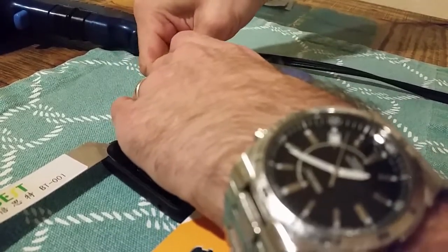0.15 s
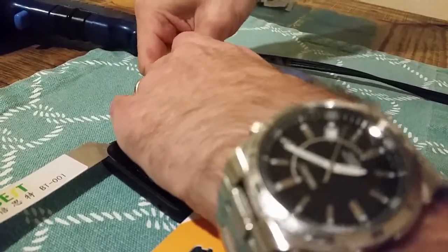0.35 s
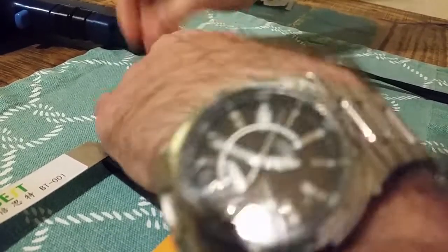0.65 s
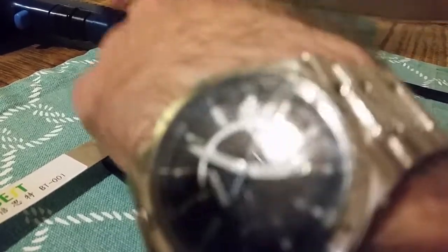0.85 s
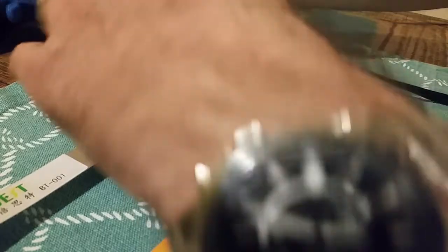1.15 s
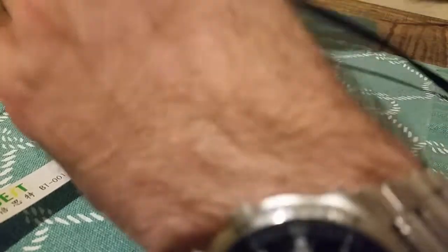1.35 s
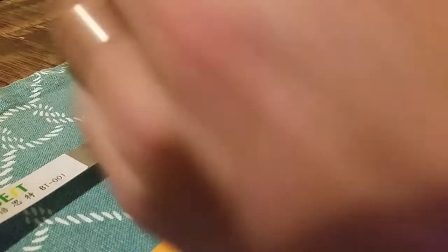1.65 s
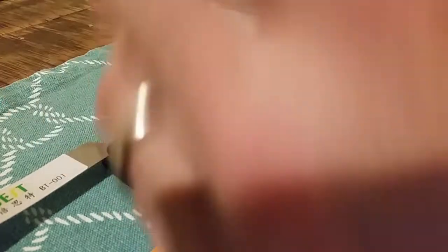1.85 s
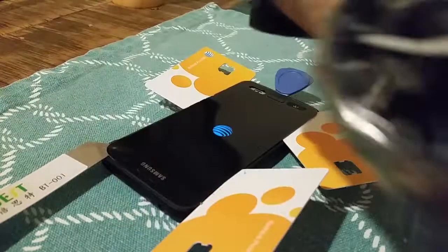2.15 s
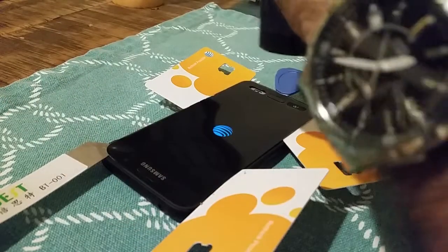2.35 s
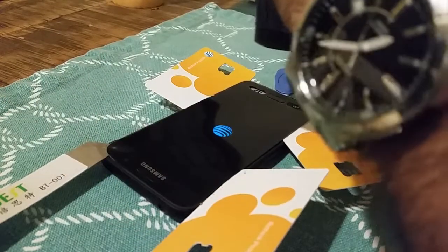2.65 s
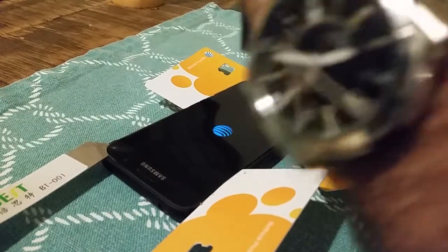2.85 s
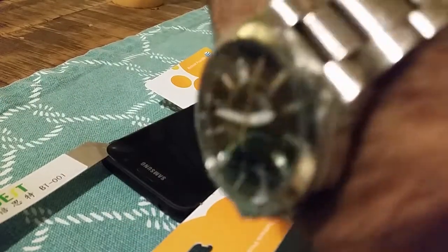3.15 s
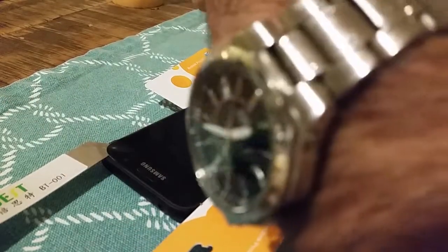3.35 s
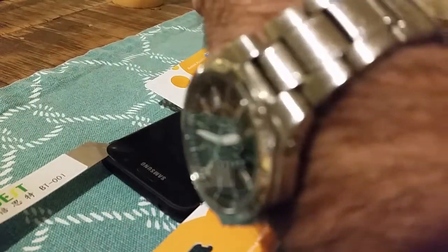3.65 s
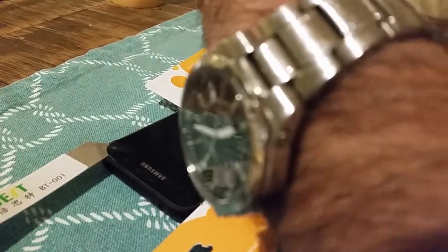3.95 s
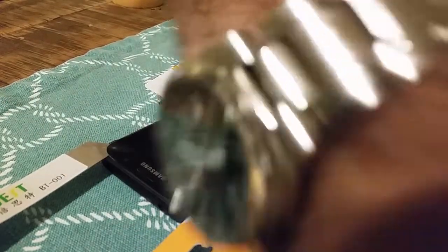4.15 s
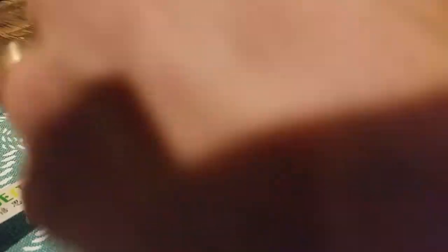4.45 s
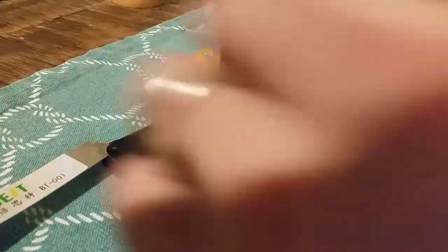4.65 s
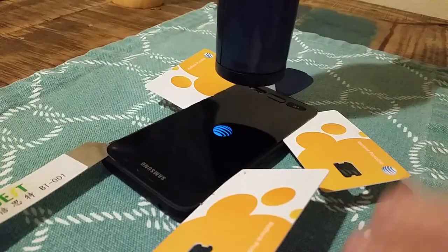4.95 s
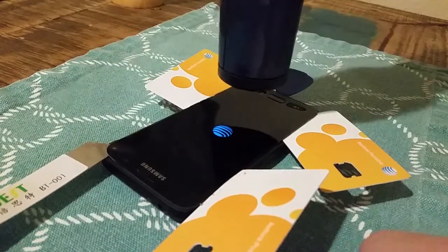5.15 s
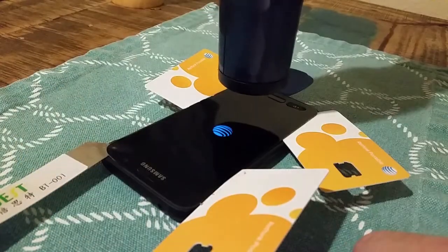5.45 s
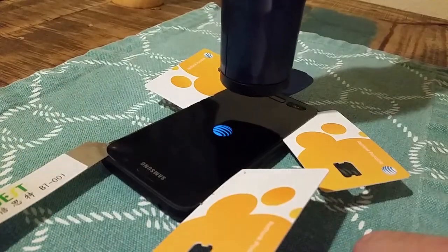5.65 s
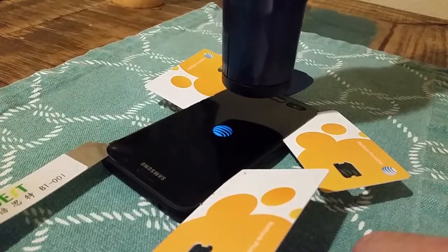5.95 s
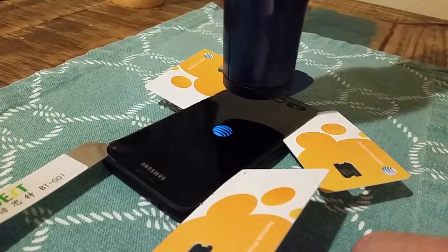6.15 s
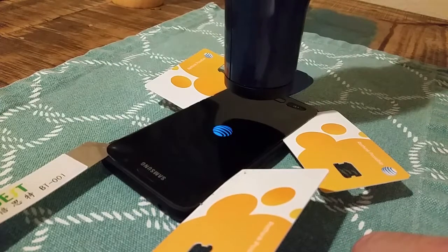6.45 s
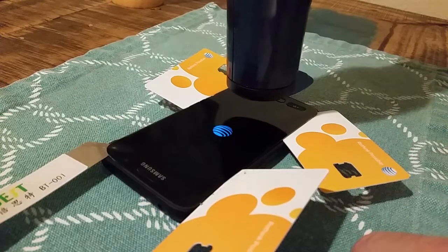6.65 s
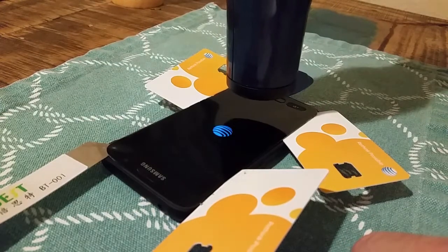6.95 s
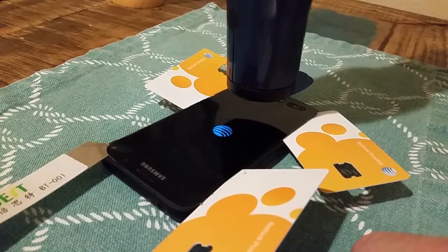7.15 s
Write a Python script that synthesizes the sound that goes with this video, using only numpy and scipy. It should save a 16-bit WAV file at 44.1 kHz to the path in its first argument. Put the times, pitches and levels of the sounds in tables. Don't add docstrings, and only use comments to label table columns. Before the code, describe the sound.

Soft handling rubs and creaks, three knocks on a wooden table, then a switch click and a hair dryer whining and rushing steadily.

```python
import sys
import numpy as np
from scipy import signal
from scipy.io import wavfile
from scipy.ndimage import uniform_filter1d

SR = 44100
rng = np.random.default_rng(int(sys.argv[2]) if len(sys.argv) > 2 else 0)


def to_linear_factor(level_db):
    exponent = np.asarray(level_db, float) / 20
    return 10 ** exponent


def file_out(sig):
    cols = np.atleast_2d(sig).T
    lim = np.clip(cols, -1, 1)
    pcm = np.round(lim * 32767).astype(np.int16)
    wavfile.write(sys.argv[1], SR, pcm)


N = 321489


def evened(x):
    return x / np.sqrt(np.mean(np.abs(x) ** 2) + 1e-20)


def read(points, hz):
    f, value = np.transpose(points)
    return np.interp(np.log(hz + 1), np.log(f + 1), value)


def columns(rows, t):
    s, *rest = np.transpose(rows)
    return [np.interp(t, s, column) for column in rest]


def add(mix, s, sound):
    part = mix[:, round(s * SR):][:, :sound.shape[-1]]
    part += sound[..., :part.shape[1]]


def drift(top_hz):
    t = np.arange(N // 64 + 2) * 64 / SR
    rates_hz = top_hz * np.geomspace(.04, 1, 16) * rng.uniform(.9, 1.1, 16)
    slow = sum(np.sin(2 * np.pi * (f * t + rng.random())) / np.sqrt(f) for f in rates_hz)
    return np.interp(np.arange(N) / SR, t, evened(slow))


def noise(field_db, same, lead=None, patchy_db=1., size=1024):
    frames, hz = N * 4 // size + 5, np.fft.rfftfreq(size, 1 / SR)[:, None]
    a, b, c, d, patches = rng.standard_normal((frames, len(hz), 5)).T
    patches = uniform_filter1d(patches, size=size // 100, axis=0)
    patches = evened(uniform_filter1d(patches, size=12, axis=1))
    level_db, balance_db = field_db(hz, np.arange(frames) * size / 4 / SR)
    share = np.clip(read(same, hz), 0, 1)
    left = a + 1j * b
    right = share * left + np.sqrt(1 - share ** 2) * (c + 1j * d)
    right = right * np.exp(-1j * (read(lead, hz) if lead else 0))
    z = np.array([left * to_linear_factor(balance_db / 2), right * to_linear_factor(-balance_db / 2)])
    z = z * to_linear_factor(level_db + patchy_db * patches)
    return signal.istft(z, nperseg=size, noverlap=size * 3 // 4)[1][:, :N]


def band_db(spectrum_db, hz, lo, hi):
    inside = (hz >= lo) & (hz < hi)
    return 10 * np.log10(np.sum(to_linear_factor(spectrum_db[inside]) ** 2) * 2.035)


def burst(hz, width):
    z = rng.standard_normal((2, 8000)) + 0.68 * rng.standard_normal(8000)
    edges = [max(hz - width / 2, 100), min(hz + width / 2, 16000)]
    band = signal.butter(3, edges, "bandpass", fs=SR, output="sos")
    return evened(signal.sosfilt(band, z)[:, 1500:])


def swell(length):
    return np.sin(np.pi * np.clip(np.arange(6500) / SR / length, 0, 1)) ** 2


def rings(modes, t, slow=0.83):
    return sum(to_linear_factor([[l_db], [r_db]] - 60 * t / (t60 * slow)) * np.sin(2 * np.pi * hz * t)
               for hz, l_db, r_db, t60 in modes)


START_S, SPIN_UP_S, DRAG = 2.5145, .1374, .655
TOP_HZ, SAG_HZ_PER_S, WARM_S = 345.3, 1.3, 4.3


def shaft(t):
    since = np.maximum(t - START_S, 1e-4)
    left = np.exp(-since / SPIN_UP_S)
    return (TOP_HZ - SAG_HZ_PER_S * np.minimum(since, WARM_S)) * (1 - left) / (1 + DRAG * left)


# t/s, level/dB, pan L-R/dB, left lead/rad
AIM = [(2.7, -27, -2, -1.6), (3.05, -25.5, -11, -2), (3.2, -21, 1, -.1), (3.35, -25, 4, -1.2),
       (3.65, -23, -3, -0.85), (3.9, -25.5, 1, -0.57), (4.2, -23.5, 3, -0.73), (4.6, -22, -5.5, 0.66),
       (5.05, -24.5, -11.5, .3), (5.28, -25.5, -3.5, 0.71), (5.8, -22, -4.5, 0.49), (6.45, -23, 0, 0.37),
       (7.29, -23, 1.5, 1.)]


def blade_tone(turn, load, t):
    blade_db, pan_db, lead = columns(AIM, t)
    blade = load ** 0.74 * to_linear_factor(blade_db + 0.82 * drift(top_hz=15.)) * np.sqrt(2)
    left = to_linear_factor(pan_db / 2) * np.cos(5 * turn + lead)
    right = to_linear_factor(-pan_db / 2) * np.cos(5 * turn)
    return blade * np.array([left, right])


# multiple, left level/dB, left near/dB, right level/dB, right near/dB
ORDERS = [(1, -34.5, -34, -28.5, -28.5), (2, -35, -35, -34, -34), (3, -44, -44, -40, -39),
          (6, -47, -47, -47, -42), (10, -39, -38, -33, -38), (15, -42, -43, -42, -52),
          (20, -52, -52, -44, -47), (25, -56, -59, -47, -41.5), (30, -44, -49, -45, -47),
          (35, -39, -43, -42, -47), (37, -39, -42, -52, -57), (38, -40, -34, -55, -52),
          (39, -42, -49, -56, -55), (40, -39, -36.5, -52, -46), (41, -47, -43, -59, -54),
          (45, -43, -50, -52, -52)]
# f/Hz, lead/rad
ORDER_LEAD = [(340, -.3), (1030, -1.3), (2050, -.5), (3430, -1.8), (5140, .2), (6860, .2), (8570, -2.9),
              (10300, 1.3)]
NEARER_S, NEARER_TAKES_S = 3.74, 0.75


def shaft_orders(turn, load, t):
    out = np.zeros((2, N))
    near = np.clip((t - NEARER_S) / NEARER_TAKES_S, 0, 1)
    for k, left_db, left_near_db, right_db, right_near_db in ORDERS:
        wander_db = .8 + .11 * min(k, 18)
        phase = k * turn + .02 * k * drift(top_hz=60.) + 2 * np.pi * rng.random()
        fade = load ** (.25 + min(k, 15) / 7) * np.sqrt(2)
        left_level = left_db + near * (left_near_db - left_db) + wander_db * drift(top_hz=15.0)
        right_level = right_db + near * (right_near_db - right_db) + wander_db * drift(top_hz=19.0)
        out[0] += fade * to_linear_factor(left_level) * np.cos(phase + read(ORDER_LEAD, k * TOP_HZ))
        out[1] += fade * to_linear_factor(right_level) * np.cos(phase)
    return out


# f/Hz, level/dB
BUZZ = [(119.9, -44), (179.9, -49)]


def motor():
    t = np.arange(N) / SR
    speed_hz = shaft(t)
    turn = 2 * np.pi * np.cumsum(speed_hz * (1 + 0.0005 * drift(top_hz=24.6))) / SR
    load = (speed_hz / speed_hz.max()) ** 3
    out = blade_tone(turn, load, t) + shaft_orders(turn, load, t)
    for hz, db in BUZZ:
        level = np.sqrt(2) * to_linear_factor(db + 2.5 * drift(top_hz=20.))
        out += level * np.sin(2 * np.pi * hz * t + .5 * drift(top_hz=10.))
    return out * np.clip((t - 2.58) / .12, 0, 1) ** 2


HAND_S, HAND_TAKES_S, HAND_DB = 4.05, 0.84, 3
HAND_FROM_HZ, HAND_TO_HZ, HAND_OCTAVES = 900, 2290, 0.34


def hand_reflection_db(hz, t):
    passed = np.clip((t - HAND_S) / HAND_TAKES_S, 0, 1)
    off = np.log2((hz + 1) / HAND_FROM_HZ) - passed * np.log2(HAND_TO_HZ / HAND_FROM_HZ)
    return HAND_DB * np.sin(np.pi * passed) ** .5 * np.exp(-(off / HAND_OCTAVES) ** 2)


# f/Hz, level/dB per Hz
RUSH = [(25, -62), (50, -59), (90, -23.5), (290, -13), (450, -15), (700, -8.5), (1300, -9), (1850, -15),
        (3200, -15.5), (4200, -15.5), (4900, -21), (9700, -27), (13300, -20.5), (15700, -25.5)]
# f/Hz, width/Hz, level/dB
BARREL = [(739, 140, 5), (960, 120, 0.5), (2550, 110, 6.5), (4180, 940, -2.5), (12500, 2500, -0.5),
          (1576, 590, -4), (4860, 190, -3)]
# f/Hz, L-R level/dB
RUSH_BALANCE = [(60, -6), (110, 5), (200, -2), (380, 1), (700, -3), (1290, -6), (2380, -7), (4400, 0.5),
                (8120, -4), (15000, 10)]
# f/Hz, likeness/0..1
RUSH_SAME = [(60, .95), (700, .94), (1250, .88), (1550, .5), (1900, .6), (2250, .25), (2800, .7),
             (3600, .5), (4200, .2), (5200, .3), (8000, .25), (16000, .15)]
# f/Hz, lead/rad
RUSH_LEAD = [(60, -.1), (450, -.4), (800, -1.4), (1300, -1.1), (1700, -.4), (2100, -1), (2600, -2.7),
             (4500, -3.1), (6500, -4), (16000, -9)]
# f/Hz, power/1
GROWTH = [(200, 1.36), (1200, 1.8), (4000, 3.9), (8000, 3.3), (10000, 1.87)]
RUSH_DB, RUMBLE_DB = -17, -7.5
AIR_LAG_S = 0.015


def air():
    def field(hz, t):
        colour = read(RUSH, hz) + sum(db / (1 + (2 * (hz - f) / w) ** 2) for f, w, db in BARREL)
        colour = colour - band_db(colour, hz, 500, 1500)
        low = read([(200, 0.085), (400, 0)], hz)
        speed_db = 20 * np.log10(shaft(t - AIR_LAG_S) / TOP_HZ)
        level = colour + RUSH_DB + low * RUMBLE_DB + read(GROWTH, hz) * speed_db
        level = level + hand_reflection_db(hz, t)
        gusts = np.interp(t, np.arange(N) / SR, drift(top_hz=18.))
        level = level + read([(1000, 0.49), (12000, .8)], hz) * (1 - low) * gusts
        return level, read(RUSH_BALANCE, hz) + 0 * t
    return noise(field, RUSH_SAME, RUSH_LEAD, patchy_db=0.81)


SWITCH_S = 2.5185
# f/Hz, level/dB, t60/s
SWITCH = [(762, -34, 0.42), (696, -52, 0.2), (1055, -54, .2)]


def switch():
    out, t = np.zeros((2, N)), np.arange(SR // 3) / SR
    modes = [(hz, db - 4.0, db + 4.5, t60) for hz, db, t60 in SWITCH]
    add(out, SWITCH_S, rings(modes, t) * np.clip(t / 0.0044, 0, 1))
    return out


# f/Hz, level/dB
KNOCK_TAIL = [(50, -39.5), (150, 3.5), (500, -7), (800, -20), (1100, -37.5), (3000, -53), (8000, -77),
              (13000, -66)]
# f/Hz, t60/s
KNOCK_T60 = [(60, 0.4), (300, 0.56), (1000, 0.43), (10000, 0.43)]


def knock_tail(t, slow):
    grain = rng.standard_normal((2, SR)) + 1.57 * rng.standard_normal(SR)
    hz, frame_t, z = signal.stft(grain, SR, nperseg=512)
    decay_db = 60 * frame_t / (slow * read(KNOCK_T60, hz)[:, None])
    z = z * to_linear_factor(read(KNOCK_TAIL, hz)[:, None] - decay_db)
    tail = signal.istft(z, SR, nperseg=512)[1][:, :SR]
    return tail * np.sin(np.pi / 2 * np.clip(t / 0.0079, 0, 1)) ** 2


# t/s, blow level/dB, hollow ring level/dB, time until pressed still/s, t60 factor/1
KNOCKS = [
    (1.0755, -32.5, -8, 0.011, 0.49),
    (1.2053, -24, -6.5, 0.019, 0.38),
    (1.2811, -15, 2.5, 0.043, 0.93),
]
# f/Hz, left level/dB, right level/dB, t60/s
HOLLOW = [(482, -11, 11, 0.34), (181, -6.5, -8.5, 0.94), (683, -18, 11, 0.08)]
# f/Hz, left level/dB, right level/dB, t60/s
TABLE = [(190, -8, -10, 0.31), (252, -20, -23, 0.34), (341, -15, -0.5, 0.21), (395, -12.5, -2, 0.25),
         (552, -21, -18, .25), (744, -14.5, -18, 0.061)]
# f/Hz, left level/dB, right level/dB, t60/s
LEGS = [(42.5, -21, -26.5, 1.3), (114.8, 2.5, 0.5, 0.37)]


def knocks():
    out, t = np.zeros((2, N)), np.arange(SR) / SR
    for s, db, hollow_db, hold, slow in KNOCKS:
        turns = 180 * t + 0.97 * (1 - np.exp(-t / 0.0026))
        thump = to_linear_factor([[8.], [6.]] - 60 * t / 0.023) * np.sin(2 * np.pi * turns)
        free = to_linear_factor(hollow_db - 1200 * np.maximum(t - hold, 0)) * rings(HOLLOW, t)
        free = free * np.clip((t - .003) / .002, 0, 1)
        boards = rings(TABLE, t, slow) * np.clip(t / 0.01, 0, 1)
        boards = boards + rings(LEGS, t, slow) * np.clip(t / 0.066, 0, 1)
        tail = knock_tail(t, slow)
        blow = signal.windows.hann(round(0.0016 / np.sqrt(slow) * SR))
        modes = signal.fftconvolve(thump + free + boards, blow[None] / blow.sum(), axes=1)[:, :SR]
        add(out, s, -to_linear_factor(db) * (to_linear_factor(2.0) * modes + to_linear_factor(10.0 + 0.35 * hollow_db) * tail))
    return out


# t/s, peak level/dB, centre f/Hz, width/Hz, length/s
SCUFFS = [(.648, -68, 2800, 4500, .006), (.688, -65, 2500, 3500, .006), (1.072, -68, 13800, 4000, .015),
          (1.0755, -57, 1700, 2800, .012), (1.166, -52, 750, 400, .018), (1.186, -68, 13800, 4000, .006),
          (1.195, -65.5, 1670, 2500, .05), (1.205, -63, 3000, 4000, .004), (1.235, -68, 13800, 4000, .006),
          (1.2735, -48, 3000, 2000, .0046), (1.2735, -60, 13500, 4000, .004),
          (1.282, -46, 13800, 4000, .006), (1.283, -61, 4600, 1500, .006), (1.305, -61, 13800, 3500, .07),
          (2.325, -68, 2800, 2000, .006), (2.395, -68, 2800, 2000, .006)]


def scuffs():
    out, t = np.zeros((2, N)), np.arange(6500) / SR
    for s, db, hz, width, length in SCUFFS:
        shape = np.clip(t / length * 8, 0, 1) * np.exp(-2 * t / length)
        add(out, s, to_linear_factor(db) * burst(hz, width) * shape)
    return out


# t/s, level/dB, length/s, pitch factor/1
CREAKS = [
    (0.64, -71, .03, 0.98),
    (0.679, -65, .03, 0.86),
    (0.77, -67, 0.064, 0.99),
    (0.832, -62, 0.065, 1.),
    (1.284, -54.5, 0.026, 1.02),
]
# f/Hz, width/Hz, level/dB
PLASTIC = [(820, 200, 0), (1680, 240, 0), (2420, 240, -1), (3090, 260, -7), (4000, 300, -10),
           (2300, 2600, -5)]


def creaks():
    out = np.zeros((2, N))
    for s, db, length, pitch in CREAKS:
        body = sum(to_linear_factor(level_db) * burst(hz * pitch, width) for hz, width, level_db in PLASTIC)
        add(out, s, to_linear_factor(db) * swell(length) * body)
    return out


# t/s, level/dB, f/Hz, length/s
SHIFTS = [
    (1.51, -46, 487, 0.065),
    (1.741, -56, 645, 0.16),
    (1.78, -51, 350, .06),
    (1.83, -46, 482, 0.04),
]


def shifts():
    out, t = np.zeros((2, N)), np.arange(6500) / SR
    for s, db, hz, length in SHIFTS:
        add(out, s, to_linear_factor([[db - 5], [db + 6]]) * swell(length) * np.sin(2 * np.pi * hz * t))
    return out


# t/s, length/s, dull rub level/dB, fine hiss level/dB, table rumble level/dB
STROKES = [
    (.6, 0.13, -52.5, -71, -54),
    (.76, .12, -54.5, -75, -53),
    (1.07, .08, -57, -76, -66),
    (1.17, 0.19, -45.5, -71, -55),
    (1.358, 0.2, -47.5, -81, -47),
    (1.7, .22, -50, -82, -64),
    (2.2, .03, -64, -86, -62),
]
PRESS_S, PRESS_DB, LIFT_DB_PER_S = 0.039, -5, 118


def rubbing():
    def field(hz, t):
        rub = [(150, -35), (300, 2.5), (650, -4), (900, -12.5), (3500, -31.5), (5000, -49)]
        hiss = [(10000, -42), (12500, 1), (15500, -3)]
        rumble = [(20, -9), (45, -7.0), (90, -28), (200, -73)]
        layers = []
        for points, lo, hi in [(rub, 250, 900), (hiss, 11500, 15500), (rumble, 25, 70)]:
            colour = read(points, hz)
            layers.append(colour - band_db(colour, hz, lo, hi))
        power = 1e-30
        for s, length, *layers_db in STROKES:
            press_db = PRESS_DB * np.maximum(1 - (t - s) / PRESS_S, 0)
            shape_db = press_db - LIFT_DB_PER_S * np.maximum(t - s - length, 0)
            power = power + sum(to_linear_factor(layer + db + shape_db) ** 2 for layer, db in zip(layers, layers_db))
        return 10 * np.log10(power), read(ROOM_BALANCE, hz) * 0.88
    return noise(field, [(80, .95), (400, .5), (2000, .1)], patchy_db=1.8)


# f/Hz, level/dB
HUM = [(60, -70), (119.9, -60), (179.9, -48.5)]
# f/Hz, level/dB per Hz
ROOM = [(20, -64), (45, -68), (100, -55.5), (230, -58.5), (500, -63.5), (900, -70), (1060, -78.5),
        (1300, -65), (1600, -78), (3000, -85), (3500, -84), (5000, -96.5), (9500, -106), (12000, -95),
        (15700, -85)]
# f/Hz, L-R level/dB
ROOM_BALANCE = [(60, -1.5), (130, 10), (290, -6.5), (640, -8), (1410, -9.5), (3100, -3.5), (6820, 3),
                (15000, 0.0)]
ROOM_DB = -55.5


def room():
    def field(hz, t):
        colour = read(ROOM, hz)
        level = colour - band_db(colour, hz, 250, 16000) + ROOM_DB + 0 * t
        return level, read(ROOM_BALANCE, hz)
    t = np.arange(N) / SR
    hum = 0
    for hz, db in HUM:
        level = np.sqrt(2) * to_linear_factor(db + 0.27 * drift(top_hz=4.8))
        hum = hum + level * np.sin(2 * np.pi * (hz * t + rng.random()))
    same = [(200, 0.34), (330, .1), (1400, 0.12), (2500, 0.091)]
    return hum + noise(field, same, patchy_db=0.5, size=2048)


def scene():
    dryer = motor() + air() + switch()
    handling = knocks() + scuffs() + creaks() + shifts() + rubbing()
    return dryer + handling + room()


def band_limit(x):
    return signal.sosfilt(signal.butter(12, 15830, fs=SR, output="sos"), x)


EDGE_HZ = 15750


def record(dry):
    edge = signal.firwin(1023, EDGE_HZ, window=("kaiser", 9), fs=SR)
    limited = signal.oaconvolve(dry, edge[None], "same")
    return band_limit(limited)


dry = scene()
out = record(dry)
file_out(out)
```